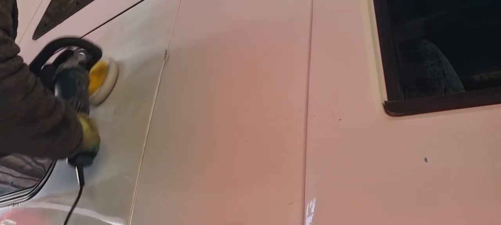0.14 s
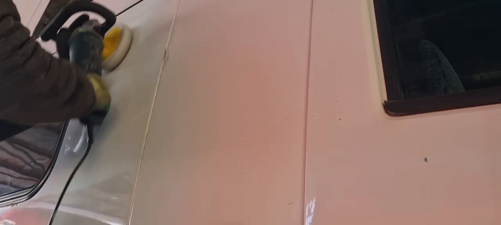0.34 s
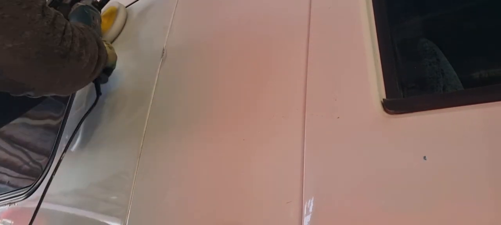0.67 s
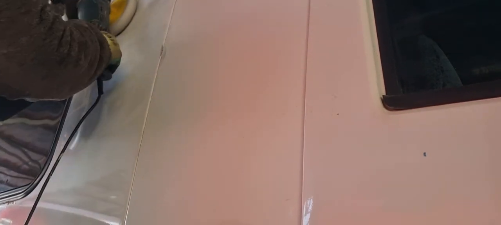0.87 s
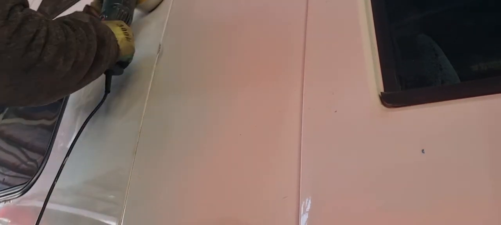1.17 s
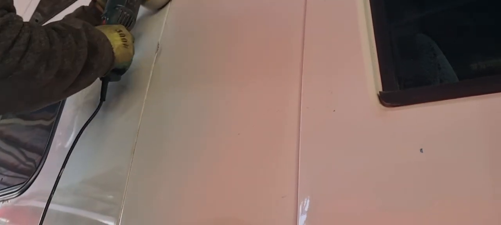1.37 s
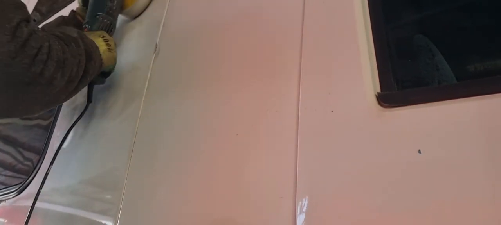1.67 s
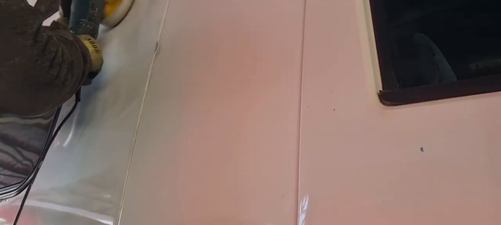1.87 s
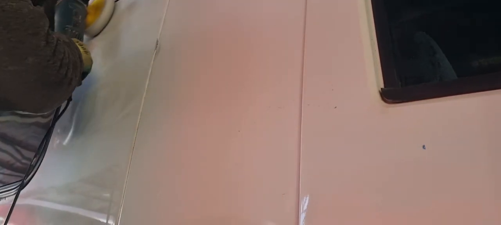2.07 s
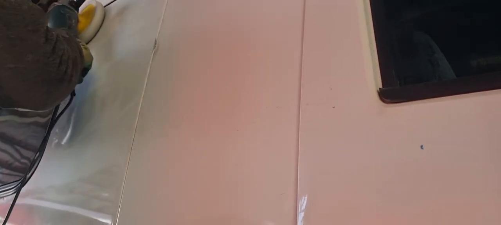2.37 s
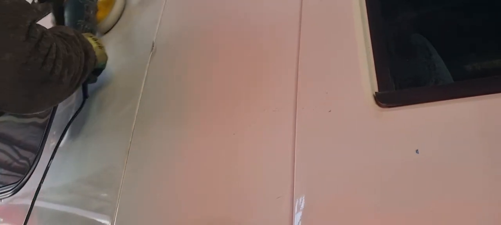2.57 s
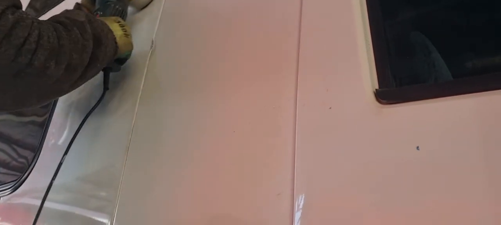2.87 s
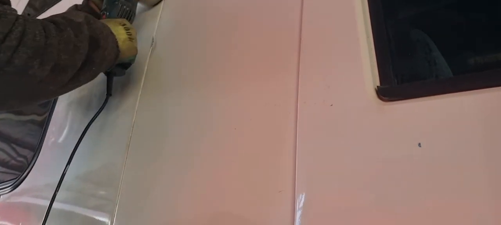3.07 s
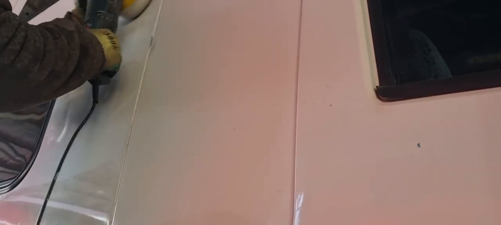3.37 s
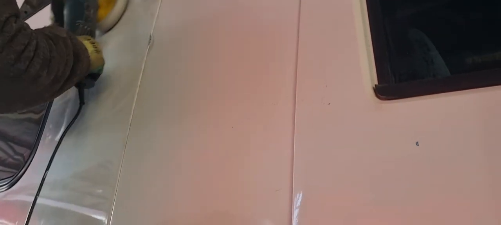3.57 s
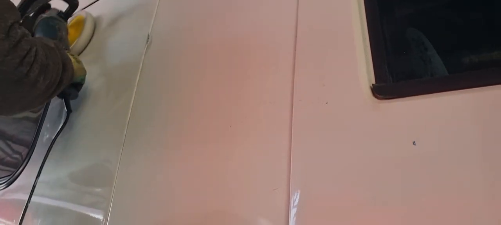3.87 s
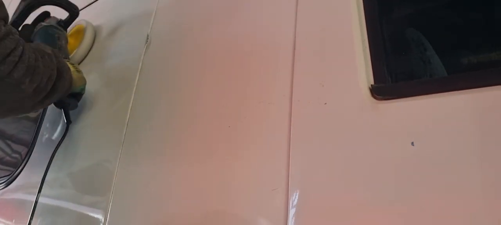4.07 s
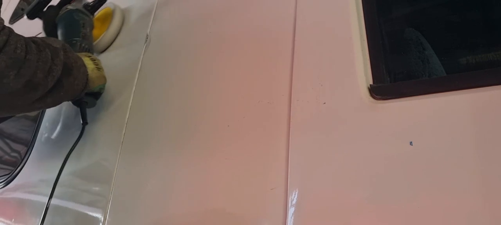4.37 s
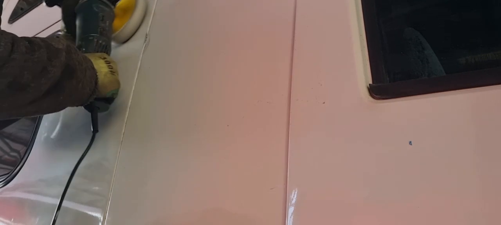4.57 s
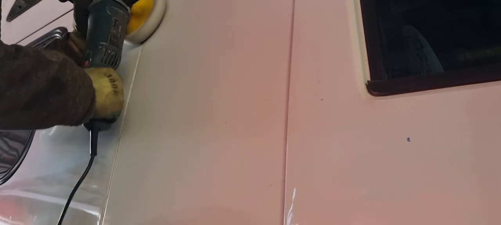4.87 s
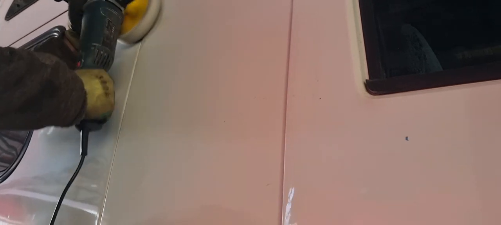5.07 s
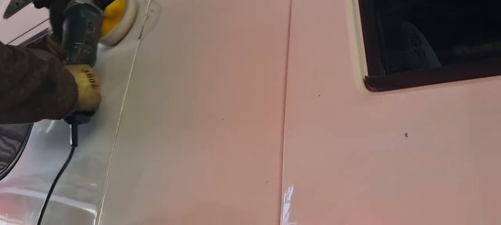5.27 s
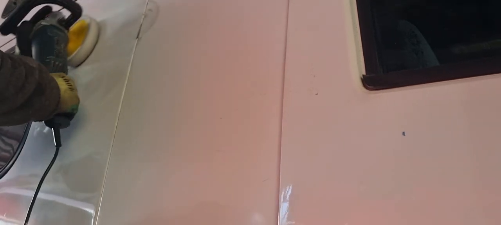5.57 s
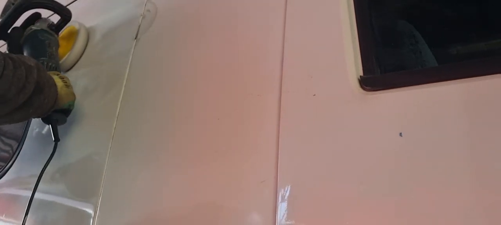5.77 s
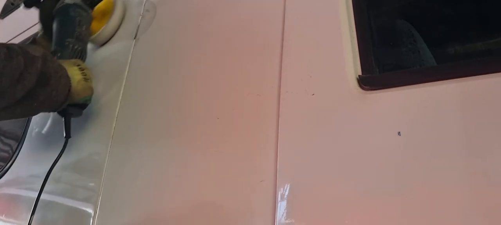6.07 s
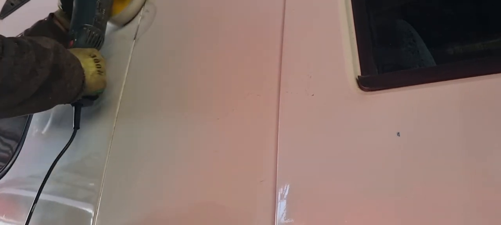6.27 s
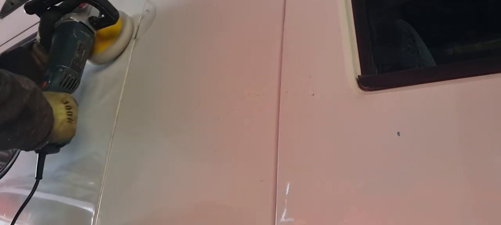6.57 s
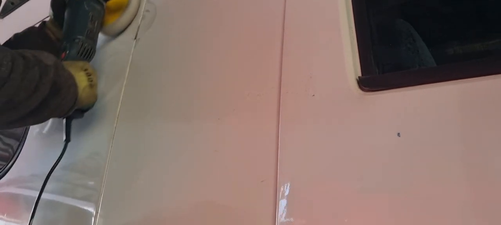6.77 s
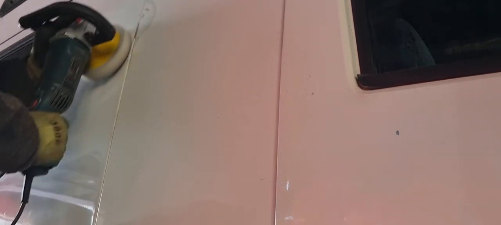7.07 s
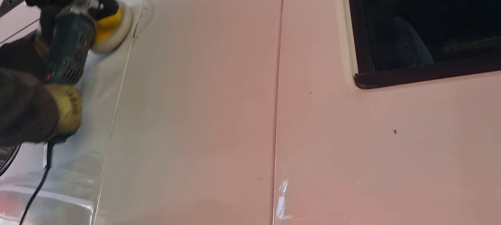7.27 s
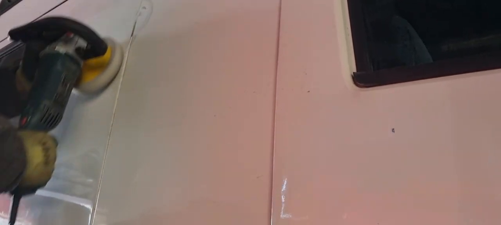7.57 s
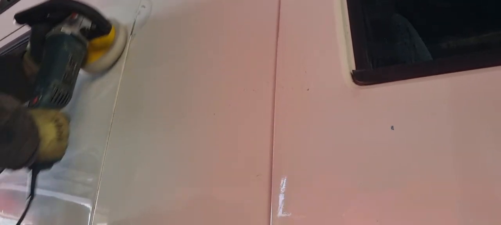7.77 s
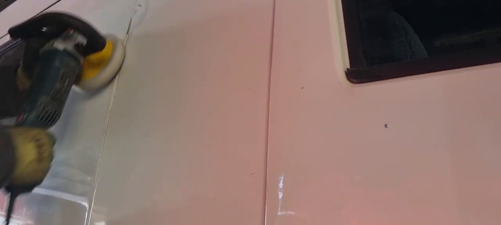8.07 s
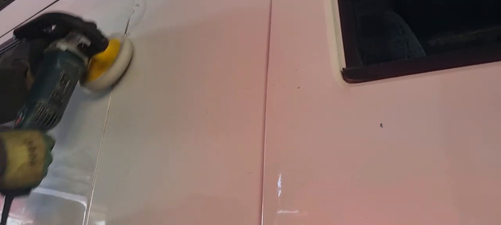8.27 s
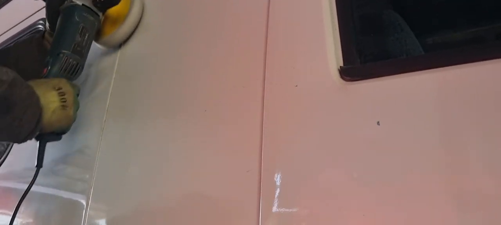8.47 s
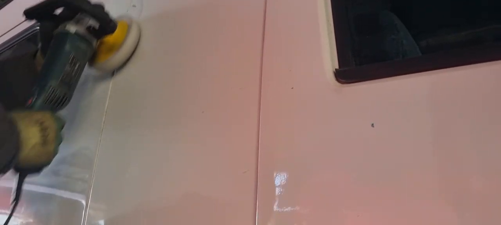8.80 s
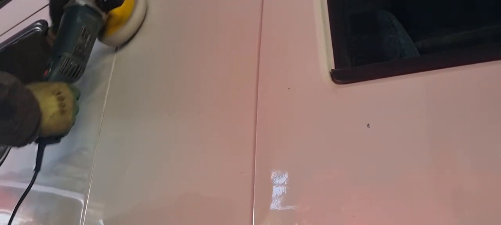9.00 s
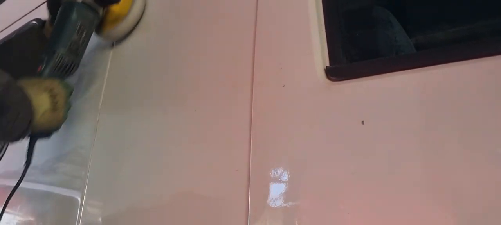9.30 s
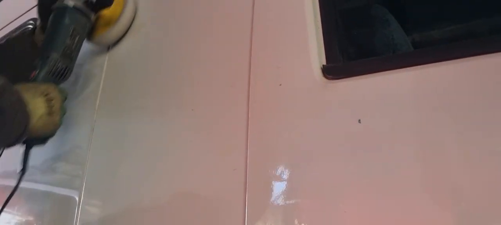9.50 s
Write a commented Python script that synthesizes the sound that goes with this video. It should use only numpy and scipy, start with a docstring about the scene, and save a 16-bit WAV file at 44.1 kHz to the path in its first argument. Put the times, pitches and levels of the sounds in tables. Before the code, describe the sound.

An electric rotary polisher runs continuously against a large painted panel in a workshop. A bright, slightly rough gear whine sits in a mid-range housing roar and strong airy hiss. Pitch dips and recovers by small amounts as the pad is pressed and eased. After about six and a half seconds the tool turns away and its tone shifts. Close stereo microphone, with very faint low rumble and hum beneath.

```python
"""In a workshop, an electric rotary polisher runs against a large panel, to one side of a two-port microphone.
Its bevel gear whines on multiples of the spindle speed, which sags as the pad is pressed: phase-locked tones.
The gear housing roars and cooling air and brushes hiss: shaped noise that beats with the rotation.
Rumble, a low drone and mains hum lie faintly underneath. Late on, the tool is turned away and its colour shifts."""
import sys
import numpy as np
from scipy import signal
from scipy.io import wavfile
from scipy.ndimage import uniform_filter1d

SR = 44100
rng = np.random.default_rng(int(sys.argv[2]) if len(sys.argv) > 2 else 0)


def wav_record(signal):
    """Record a signal, one row per channel, as 16-bit PCM in the file named by sys.argv[1]."""
    frames = np.transpose(np.atleast_2d(signal))
    bounded = np.clip(frames, -1, 1)
    # unit amplitude maps onto the largest positive 16-bit level
    quanta = np.round(bounded * 32767).astype(np.int16)
    wavfile.write(sys.argv[1], SR, quanta)


N = 425124
TIME = np.arange(N) / SR
TEETH, ARMATURE = 26, 26 / 3  # tooth contacts and armature turns per spindle turn
STEPS = 2 ** 17  # points in one full cycle of the gear train, three spindle turns
TURN_S = 6.5, 6.9  # the tool is turned away over this span
RECEDE_DB = -0.5, -6  # level change of the weak tones before and after the turn


def gain_of(db):
    """Level definition: decibels to amplitude ratio."""
    return 10 ** (np.asarray(db) / 20)


def evened(x):
    """Power normalization: scales to rms 1."""
    return x / np.sqrt(np.mean(abs(x) ** 2) + 1e-20)


def read(points, hz, axis=1):
    """Spectral interpolation: one table column along a log-frequency axis."""
    table = np.transpose(points)
    return np.interp(np.log(hz + 1), np.log(table[0] + 1), table[axis])


def curve(rows, axis):
    """Linear interpolation in time: one table column at every sample."""
    table = np.transpose(rows)
    return np.interp(TIME, table[0], table[axis])


def swell(centre_s, half_s):
    """Gaussian envelope: 1 at its centre, 1/e at half_s to either side."""
    return np.exp(-((TIME - centre_s) / half_s) ** 2)


def drift(top_hz, t, low_hz=0.094):
    """Superposition of slow sines in random phase: a wandering value of rms 1."""
    hz = np.geomspace(low_hz, top_hz, num=16)[:, None]
    coarse = np.arange(0, N / SR + .1, .01)
    sines = np.sin(2 * np.pi * (hz * coarse + rng.random(hz.shape)))
    slow = evened((sines / hz ** .2).sum(axis=0))
    return np.interp(t, coarse, slow)


# spindle speed over time as the pad is pressed and eased, before inertia rounds it:
# start_s [s], speed [turns per s]
SPEED = [(0.0, 38.99), (0.42, 38.33), (0.7, 40.1), (0.93, 40.2), (1.16, 38.8), (1.86, 39.6), (2.51, 38.24),
         (2.65, 39.32), (2.93, 40.23), (3.67, 40.07), (4.04, 38.84), (4.32, 40.12), (5.06, 38.12),
         (5.15, 38.74), (5.34, 40.48), (5.48, 40.5), (5.67, 39.73), (6.18, 40.26), (6.41, 41.1),
         (6.73, 39.9), (6.97, 41.74), (7.24, 39.89), (7.52, 41.01), (7.8, 39.61), (7.94, 41.37),
         (8.68, 41.1), (8.92, 39.75), (9.1, 40.7), (9.33, 39.89), (9.64, 41.75)]


def spindle_speed():
    """Rotational inertia: the rotor rounds off each change of speed, here by a moving average."""
    inertia_s = .14
    return uniform_filter1d(curve(SPEED, axis=1), round(inertia_s * SR), mode="nearest")


SPINDLE = spindle_speed()
TURNS = np.cumsum(SPINDLE) / SR
CYCLE_STEP = (TURNS / 3 % 1 * STEPS).astype(int)  # position within the gear-train cycle
AWAY = np.interp(TIME, TURN_S, [0, 1])  # 0 facing, 1 turned away

# how sound reaches the two microphone ports:
# pitch_hz [Hz], left_minus_right_db [dB], likeness [0-1], left_lead [radians]
PORTS = [(60, -1, 0.94, 0.1), (350, 0.5, 1, 0.88), (523, 1.5, 0.36, 0.46), (967, -0.2, 1, 1.56),
         (1590, -3.5, 0.17, 1.99), (2170, -3, 0.78, 2.93), (2500, 8, 0, 2.4), (3390, -2, 0.67, 3.16),
         (4920, -3.5, 0.3, 5.36), (5630, -3.5, 0, 5.4), (7050, 1, 0.44, 10), (8180, 8, 0.28, 13.5),
         (9260, 5, 0.35, 17.86), (13000, -2.5, 0.17, 25.6), (14800, 7, 0.7, 27.3)]


def ports(hz):
    """Spatial coherence: gain (left times, right divided), likeness and left phase lead of the two ports."""
    pan = gain_of(read(PORTS, hz, axis=1) / 2)
    likeness = np.clip(read(PORTS, hz, axis=2), 0, 1)
    return pan, likeness, read(PORTS, hz, axis=3)


# change of the tool's noise colour once it is turned: pitch_hz [Hz], change_db [dB]
AWAY_COLOUR = [(200, 0), (550, 3.5), (900, 0.6), (1300, -3), (2200, 0), (3500, 0.5), (6000, 1.0),
               (7500, -1.5), (12000, 0.5)]


def noise(shape, patchy_db, size, on_tool=False):
    """Short-time Fourier synthesis: random spectra with drifting patches at two ports; mid signal of rms 1."""
    hop = size // 4
    hz = np.fft.rfftfreq(size, 1 / SR)
    frame_s = np.arange(N // hop + 5) * hop / SR
    a, b, c, d, patches = rng.standard_normal((len(frame_s), len(hz), 5)).T
    patches = uniform_filter1d(patches, size // 80, axis=0)  # along frequency
    patches = evened(uniform_filter1d(patches, 4096 // hop, axis=1))  # along time
    pan, same, lead = (column[:, None] for column in ports(hz))
    sway = .05 * hz[:, None] / 1000 * drift(1.5, frame_s)  # radians; the tool moves about
    right = a + 1j * b
    left = same * right + np.sqrt(1 - same ** 2) * (c + 1j * d)
    left = left * np.exp(1j * (lead + sway))
    turned_db = on_tool * np.outer(read(AWAY_COLOUR, hz), np.interp(frame_s, TURN_S, [0, 1]))
    colour = shape(hz)[:, None] * gain_of(patchy_db * patches + turned_db)
    spectra = np.array([left * pan, right / pan]) * colour
    out = signal.istft(spectra, nperseg=size, noverlap=size - hop)[1][:, :N]
    return out / np.sqrt(np.mean(out.mean(axis=0) ** 2))


def throb(depths):
    """Amplitude modulation locked to the spindle, from (order, depth) pairs."""
    return 1 + sum(depth * np.cos(2 * np.pi * (order * TURNS + rng.random())) for order, depth in depths)


def tones(orders, dbs, scatter, pan=None, lead=None):
    """Order synthesis and multipath: gear-locked tones flutter as shifting reflections add to the direct sound."""
    bins = np.round(np.asarray(orders) * 3).astype(int)
    lines = np.zeros(STEPS, complex)
    lines[bins] = gain_of(dbs) * np.exp(2j * np.pi * rng.random(len(orders)))
    wave = np.sqrt(2) * STEPS * np.fft.ifft(lines)[CYCLE_STEP]
    mean_hz = np.mean(orders) * np.mean(np.transpose(SPEED)[1])
    table_pan, same, table_lead = ports(mean_hz)
    pan = table_pan if pan is None else pan
    lead = table_lead if lead is None else lead
    t = TIME[::64]  # reflections change slowly
    shared, own_left, own_right = (
        (drift(7.5, t, low_hz=0.694) + 1j * drift(7.5, t, low_hz=0.7083)) / 2 for _ in range(3))
    left, right = (1 + scatter * (same * shared + np.sqrt(2 - same ** 2) * own)
                   for own in (own_left, own_right))
    paths = np.array([left * pan * np.exp(1j * lead), right / pan])
    heard = (wave * np.repeat(paths, 64, axis=1)[:, :N]).real
    return heard / np.sqrt(1 + scatter ** 2)


# rumble over time: start_s [s], level_db [dB]
RUMBLE_LEVEL = [(0, -49.5), (3.6, -48.5), (4.2, -44), (9.64, -47.5)]
# relative spectra of rumble and drone: pitch_hz [Hz], level_db [dB]
RUMBLE = [(15, -10), (35, 8), (65, 11), (100, -20), (150, -18), (300, -42)]
DRONE = [(160, -13.5), (250, 2), (350, 0.5), (500, 9.5), (650, -17), (1000, 8), (2000, -16)]
# rises of the drone: centre_s [s], half_length_s [s, to 1/e of the rise], rise_db [dB]
SWELLS = [(.2, 0.35, 6.5), (2.074, 0.16, 11), (8.205, 0.23, 4)]
# mains tones, mean level: pitch_hz [Hz], level_db [dB]
HUM = [(100, -57.5), (500, -57)]


def shop():
    """Slowly changing background: low-frequency noise bands plus mains harmonics of wavering level."""
    rumble = noise(lambda hz: gain_of(read(RUMBLE, hz)), 1.1, size=4096)
    rumble = rumble * gain_of(curve(RUMBLE_LEVEL, axis=1))
    drone_db = -42.5 + sum(db * swell(s, half) for s, half, db in SWELLS)
    drone = noise(lambda hz: gain_of(read(DRONE, hz)), 2.4, size=2048) * gain_of(drone_db)
    hum = 0
    for hz, db in HUM:
        level = np.sqrt(2) * gain_of(db + 1.7 * drift(1.5, TIME))
        hum = hum + level * np.sin(2 * np.pi * hz * TIME)
    return rumble + drone + hum


# noise of the tool before its beat: start_s [s], housing_level_db [dB], air_level_db [dB]
TOOL_NOISE = [(0, -23.5, -22), (1.9, -23, -21), (2.4, -24, -23.5), (2.85, -22, -20.5), (3.4, -22.5, -20),
              (4.0, -23, -23.5), (4.5, -22.5, -21.5), (5.0, -23.5, -20.5), (5.4, -21.5, -19.5),
              (5.85, -25, -22.5), (6.25, -22, -19.5), (7.7, -23, -19), (9.64, -22.5, -19.5)]
# relative spectrum of the hiss: pitch_hz [Hz], density_db [dB per Hz]
AIR = [(500, -31), (1000, -72), (1600, -4), (2050, 5.5), (2500, -3), (3200, 1), (3700, -1.5), (4200, -3),
       (5200, -2.5), (6800, -2.5), (8300, -7), (10500, -9.5), (12500, -6), (15500, -10.5)]


def air():
    """Broadband flow and friction noise: cooling air, brushes and pad, pulsing with spindle and teeth."""
    beat = throb(zip([1, 2, 4, TEETH, 2 * TEETH], [0.063, 0.037, 0.022, 0.16, 0.01]))
    hiss = noise(lambda hz: gain_of(read(AIR, hz)), 1.42, size=512, on_tool=True)
    return hiss * beat * gain_of(curve(TOOL_NOISE, axis=2))


# housing resonances: pitch_hz [Hz], width_hz [Hz, full width at half amplitude], relative_level_db [dB]
HOUSING = [(762.5, 73, -1.5), (915, 220, -0.5), (1095, 150, -1), (1237, 260, 2), (1390, 880, -10.5)]


def housing():
    """Modal resonance: gear rattle rings in the housing and beats with the turning pad."""
    def modes(hz):
        """Resonance curves of the modes added as power."""
        peaks = (gain_of(db) / (1 + (2 * (hz - f) / width) ** 2) for f, width, db in HOUSING)
        return np.sqrt(sum(peak ** 2 for peak in peaks))

    beat = throb(zip([1, 2, 4, 6], [0.017, 0.04, 0.07, 0.1]))
    roar = noise(modes, 1.58, size=1024, on_tool=True)
    return roar * beat * gain_of(curve(TOOL_NOISE, axis=1))


# armature, fan and commutator tones, before receding: multiple [of armature speed], level_db [dB]
MOTOR = [(2, -42), (4, -41), (7, -44), (14, -42), (25, -49), (35, -47)]
# pad wobble relative to its level over time: order [per spindle turn], relative_level_db [dB]
WOBBLE = [(2, -1), (3, -13)]
# low tones over time: start_s [s], unbalance_level_db [dB], wobble_level_db [dB]
LOW = [(0.0, -41, -57), (0.4, -47.5, -39), (0.9, -40, -59), (1.45, -60, -47), (2.1, -37.5, -51),
       (2.4, -62, -60), (2.6, -37.5, -53.0), (3.25, -56, -50), (3.75, -45.0, -50), (4.35, -50, -49),
       (4.7, -39.5, -44), (5.0, -52.0, -47), (5.4, -33, -52), (5.7, -55, -41), (6.2, -41, -47),
       (6.35, -54.0, -58.0), (6.75, -62, -39), (6.9, -56.0, -65), (7.2, -70, -42.5), (9.64, -54, -57)]


def motor():
    """Rotating unbalance: armature tone, its higher tones in three groups, and the wobble of the pad."""
    multiple, db = np.transpose(MOTOR)
    groups = np.array_split(np.arange(len(db)), 3)
    weak = sum(tones(ARMATURE * multiple[g], db[g], 1.6) for g in groups)
    weak += tones([6], [-52], .9)  # sixth spindle order
    weak = gain_of(np.interp(AWAY, [0, 1], RECEDE_DB)) * weak
    unbalance = tones([ARMATURE], [0], 0.95) * gain_of(curve(LOW, axis=1))
    second, third = (tones([order], [db], 0.2) for order, db in WOBBLE)
    third = third * gain_of(8 * AWAY)  # grows by 8 dB once the tool is turned
    return weak + unbalance + (second + third) * gain_of(curve(LOW, axis=2))


# crown run-out puts side tones one spindle order apart; a row for each harmonic gives its first pair:
# mean_level_db [dB re the harmonic]
RUNOUT = [-14, -15, -8, -17, -8, -8, -7, -4, -1, -3, -2, -10]


def harmonic(multiple, scatter, pan=None, lead=None):
    """Modulation sidebands: a tooth-rate harmonic at 0 dB with uneven side tones."""
    side = np.arange(-8, 9)
    first_db = RUNOUT[multiple - 1]
    outer_db = np.minimum(first_db - 5, -13) - 1.2 * abs(side)
    dbs = np.where(abs(side) == 1, first_db, outer_db) + 2 * rng.standard_normal(len(side))
    return tones(TEETH * multiple + side, dbs * (side != 0), scatter, pan, lead)


# weaker whine harmonics, before receding and flare: multiple [of tooth rate], level_db [dB]
OVERTONES = [(3, -37), (6, -39), (7, -43), (9, -41), (10, -41), (12, -43)]
# second, fourth and fifth whine harmonics over time: start_s [s], level_db [dB]
SECOND = [(0.0, -28.5), (0.2, -19), (0.45, -29), (0.75, -22), (1.35, -33), (1.75, -30.5), (2.15, -32),
          (3.3, -24), (4.15, -29.5), (4.35, -17.5), (4.8, -36.5), (4.95, -25.5), (5.8, -29.5),
          (6.05, -20.5), (6.15, -32), (6.65, -28), (6.8, -29), (7.401, -29), (7.55, -20.5), (7.95, -31),
          (8.15, -21.0), (9.64, -20.5)]
FOURTH = [(0.0, -30), (1.0, -37), (1.2, -24.5), (2.1, -32), (2.25, -28), (2.35, -33), (3.2, -24),
          (3.6, -34), (4.25, -26), (4.7, -36), (4.8, -23.0), (5.35, -32), (6.65, -26.5), (7.05, -25),
          (7.95, -24.5), (8.15, -20.0), (8.25, -31.5), (8.55, -17.0), (8.8, -25), (9.05, -29), (9.5, -25.5),
          (9.64, -22)]
FIFTH = [(0.0, -36), (1.25, -28.5), (1.8, -32), (2.05, -25.5), (2.45, -39.5), (2.85, -26), (3.3, -36),
         (3.7, -31.5), (4.25, -38), (4.45, -30), (5.9, -40), (6.05, -29), (6.45, -43), (9.64, -45)]
# 2nd and 4th at the ports: half_left_minus_right_db [dB], left_lead_before_turn [radians], after [radians]
WHINE_PORTS = [(-2.5, 1.28, 4.24), (-3.5, 4.04, 4.05)]
# gear tones that slide over housing resonances: order [per spindle turn]
SLIDING_ORDERS = [26, 28, 32, 208]
# for each of them: level_db [dB at REFERENCE_SPEED before the turn and flare], slope [dB per turn per s],
# turned_change_db [dB], scatter [reflected to direct amplitude ratio]
SLIDING = [(-24.5, 1.5, -0.7, 0.19), (-26.5, 1, -29, 0.48), (-27, 3, -40, 0.18), (-36.5, 2.5, -3, 0.66)]
REFERENCE_SPEED = 40  # turns per s
FLARE_S, FLARE_HALF_S, FLARE_DB = 5.0, 0.28, 6.4  # the upper whine flares at the hardest press


def gears():
    """Tooth-mesh excitation: whine harmonics plus two strong tones of uneven tooth spacing."""
    flare_db = FLARE_DB * swell(FLARE_S, FLARE_HALF_S)
    overtones = sum(harmonic(k, .9) * gain_of(db) for k, db in OVERTONES)
    out = overtones * gain_of(np.interp(AWAY, [0, 1], RECEDE_DB) + flare_db)
    for k, level, (pan_db, before, after) in zip([2, 4], [SECOND, FOURTH], WHINE_PORTS):
        lead = np.interp(AWAY[::64], [0, 1], [before, after])
        out += harmonic(k, 0.34, gain_of(pan_db), lead) * gain_of(curve(level, axis=1))
    out += harmonic(5, .35) * gain_of(curve(FIFTH, axis=1))
    for order, (db, slope_db, away_db, scatter) in zip(SLIDING_ORDERS, SLIDING):
        # orders that are not a multiple of the tooth count have no side tones
        tone = tones([order], [0], scatter) if order % TEETH else harmonic(order // TEETH, scatter)
        level_db = db + slope_db * (SPINDLE - REFERENCE_SPEED) * (1 - AWAY) + away_db * AWAY
        if order > 4 * TEETH:
            level_db = level_db + flare_db
        out += tone * gain_of(level_db)
    return out


def scene():
    """Linear superposition: all sources together."""
    return shop() + air() + housing() + motor() + gears()


def record(dry):
    """Band limiting by a linear-phase low-pass, then clipping at full scale."""
    edge_hz = 15760
    low_pass = signal.firwin(1023, edge_hz, window=("kaiser", 9), fs=SR)
    return np.clip(signal.oaconvolve(dry, low_pass[None], "same"), -1, 1)


dry = scene()
out = record(dry)
wav_record(out)
```